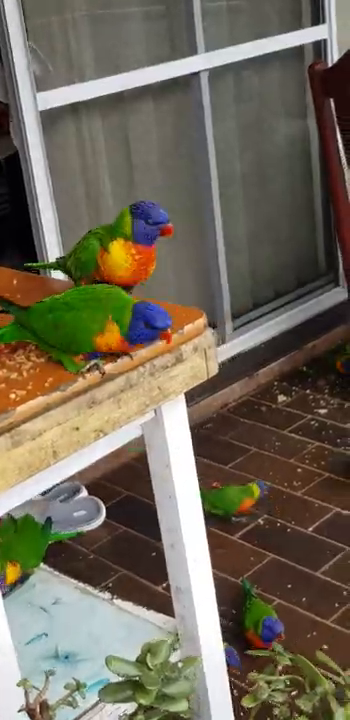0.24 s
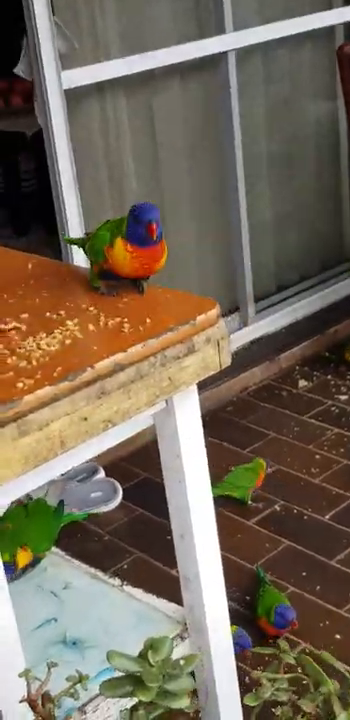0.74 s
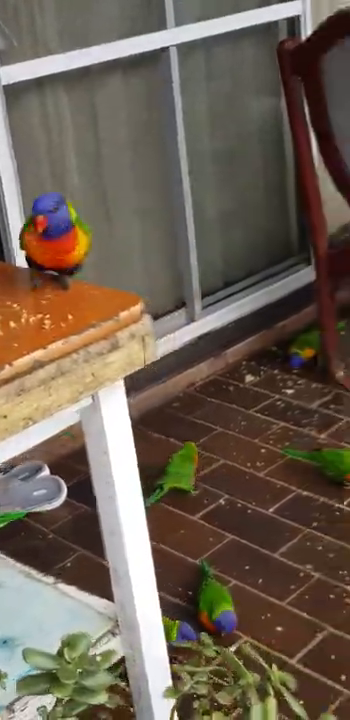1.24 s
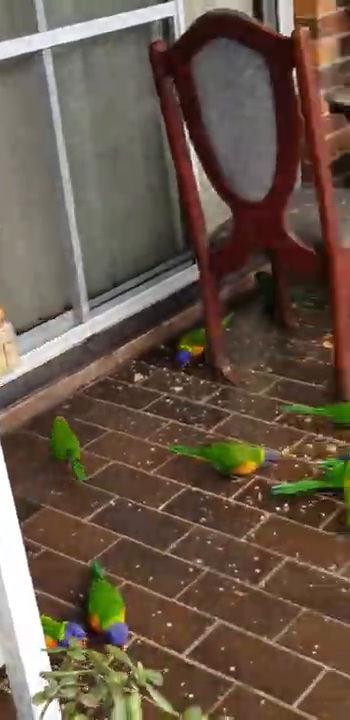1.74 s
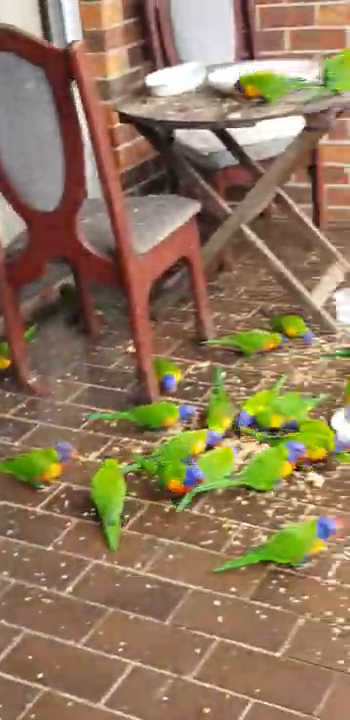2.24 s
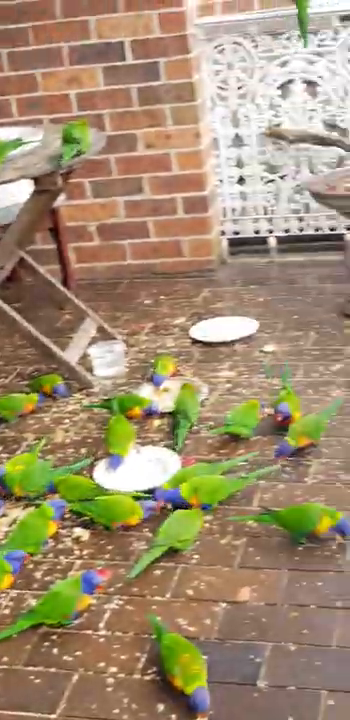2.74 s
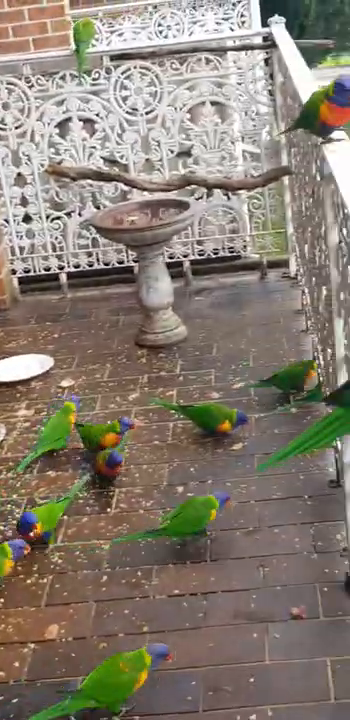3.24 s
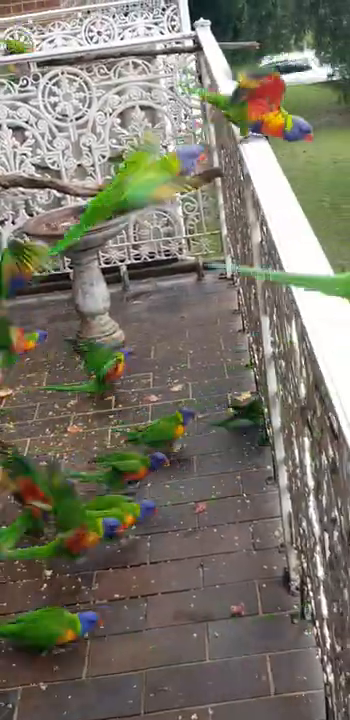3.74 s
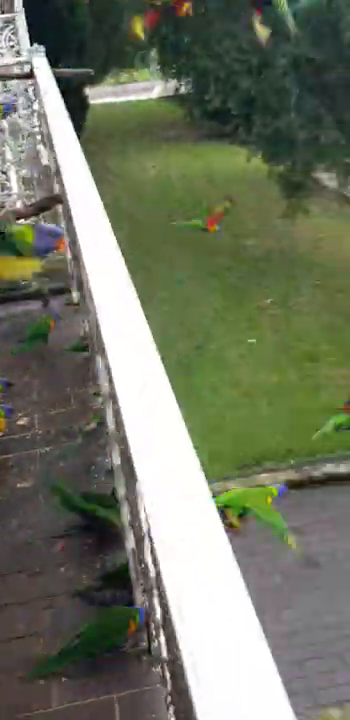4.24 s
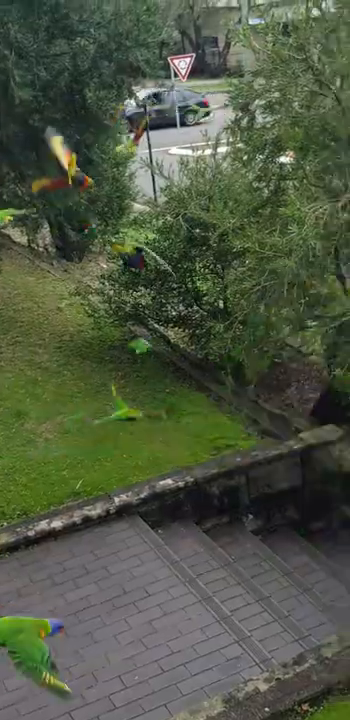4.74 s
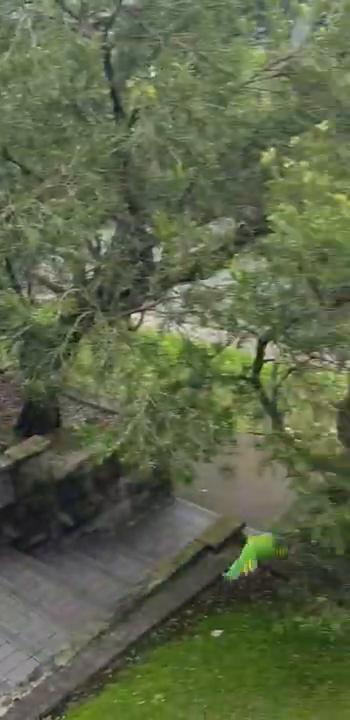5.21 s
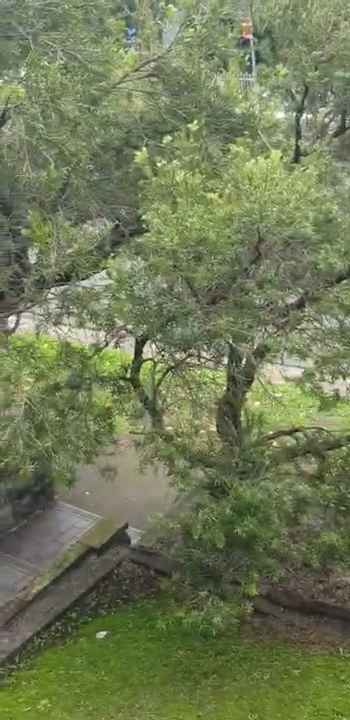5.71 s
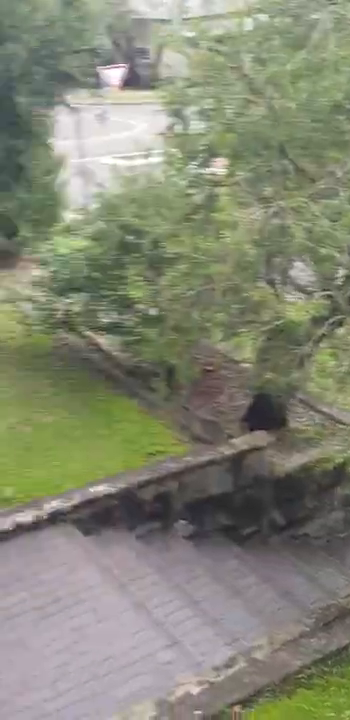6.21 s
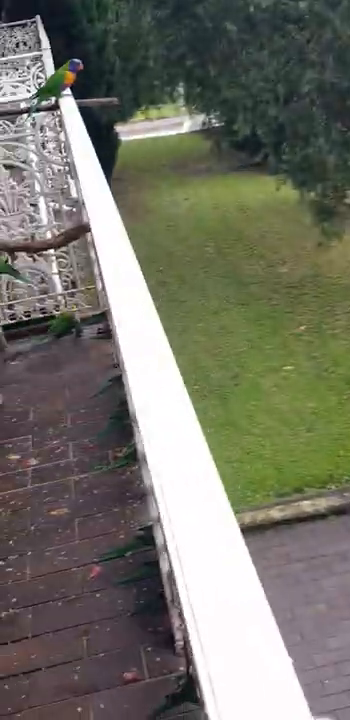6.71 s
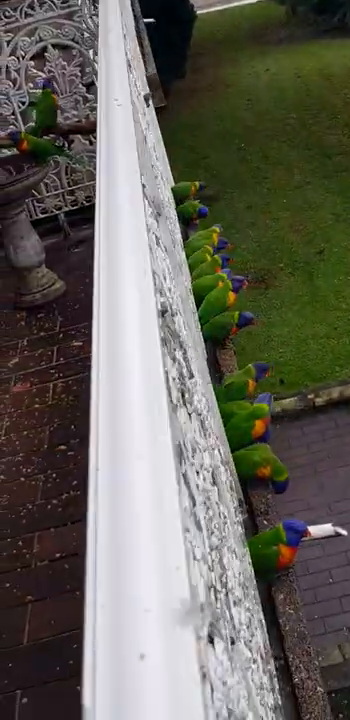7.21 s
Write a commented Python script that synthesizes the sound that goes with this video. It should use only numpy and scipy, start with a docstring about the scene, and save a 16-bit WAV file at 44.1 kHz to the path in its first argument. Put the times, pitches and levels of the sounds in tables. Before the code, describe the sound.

Parrots shriek and rasp close by on a balcony, then the flock bursts off in a wing flurry and screeches on from the garden.

```python
"""Lorikeets feed on a brick balcony: at first gliding shrieks and hoarse squabbling rasps overlap, near the microphone.
Midway the flock takes off in a flurry of wings, puffs of feather noise; then it calls from the garden, sounding wetter.
Calls are rough gliding tones with overtones; many farther ones blur into a chorus, and scattered noise tails add echo.
Light wind, lumpy low noise at the microphone, fades away late; a faint suburban hum of shaped noise stays throughout."""
import sys
import numpy as np
from scipy import signal
from scipy.fft import rfft, irfft, next_fast_len
from scipy.io import wavfile
from scipy.ndimage import uniform_filter1d, map_coordinates

SR = 44100
rng = np.random.default_rng(int(sys.argv[2]) if len(sys.argv) > 2 else 0)


def generate_wav(signal):
    """Clip the signal to [-1, 1] and save it as 16-bit WAV at the path in sys.argv[1]."""
    frames = np.transpose(np.atleast_2d(signal))
    scaled = np.clip(frames, -1, 1) * 32767
    pcm = np.round(scaled).astype(np.int16)
    wavfile.write(sys.argv[1], SR, pcm)


N = 328986  # length of the scene [samples]

# All levels below are relative; later gains and the microphone still act on them.
# Clear calls of the nearest birds: (start [s], length [s], pitch [Hz], glide [octaves], roughness [share],
# level of the fundamental [dB], overtones over the fundamental [dB])
SHRIEK_CALLS = [(0.029, 0.086, 1950, -0.13, 0.39, -42, -17), (0.113, .1, 2110, -0.0022, 0.34, -42, -11.5),
                (0.265, 0.096, 2730, 0.068, .2, -38.5, -7.5), (0.364, .058, 3960, 0.16, 0.21, -32.5, -11.5),
                (0.416, 0.069, 2904, -.2, .14, -37, -6), (0.438, 0.082, 1693, -0.29, 0.61, -35, -9),
                (0.518, 0.049, 2390, 0.02, 0.5, -32.5, 1), (.561, 0.014, 4993, 0.023, 0.01, -14.5, -21),
                (0.585, 0.018, 2478, 0.016, 0.16, -25.5, -8), (0.914, 0.073, 3210, 0.092, 0.45, -27, -3.5),
                (0.939, .058, 2682, -0.31, 0.41, -25, -1.5), (1.027, .082, 2225, -0.14, 0.44, -29.5, -1),
                (1.115, 0.068, 2380, -0.081, 0.08, -36, -2.5), (1.413, .021, 3720, 0.29, 0.15, -36.5, -3),
                (1.433, .038, 4840, -0.032, 0, -34, -21), (1.867, 0.075, 3220, 0.16, 0.45, -26, 3.5),
                (1.929, 0.062, 2924, -0.085, 0.23, -21.5, 0.5),
                (1.982, 0.061, 3175, -0.075, 0.42, -23.5, 1), (3.314, 0.028, 2050, .3, .3, -43, -7),
                (3.395, 0.05, 2167, -0.08, 0.23, -29.5, -8.5), (3.894, 0.05, 2246, .3, 0.43, -28, 1.5),
                (3.918, 0.1, 4300, -0.048, 0.47, -27, -6), (4.044, 0.12, 3110, 0.18, 0.5, -27.5, -2),
                (4.16, .06, 2200, -0.21, 0.36, -31, -4), (4.228, 0.073, 2830, 0.23, 0.23, -24.5, -3.5),
                (4.294, 0.17, 4560, -0.037, 0, -27, -8), (4.329, .06, 3320, -0.12, .19, -23, -7.5),
                (4.402, 0.067, 3447, 0.042, 0.16, -24.5, -2), (4.409, 0.1, 2937, .08, .27, -27, -2.5),
                (4.601, 0.088, 3706, .35, 0.39, -29.5, -6), (4.68, 0.067, 4320, 0.012, 0.16, -30.5, 1.5),
                (4.792, 0.34, 1724, -0.051, 0.24, -39.5, -20), (4.82, 0.15, 2910, 0.15, .26, -28, -6),
                (4.893, .072, 4050, -0.064, 0.17, -30, -4.5), (4.992, 0.12, 2826, .22, 0.34, -33.5, -0.5),
                (5.136, 0.058, 4030, 0.12, 0.28, -39, -20), (5.2, 0.047, 2230, 0.15, 0.34, -37, 4),
                (5.236, 0.054, 2656, 0.011, 0.1, -35, 7.5), (5.274, 0.11, 3090, 0.039, 0.22, -31.5, -4),
                (5.491, 0.099, 2647, 0.223, 0.3, -34.5, -3), (5.568, .07, 3094, .1, 0.16, -33.5, 1),
                (5.601, 0.097, 3317, -0.34, .03, -29, -12.5), (5.854, 0.076, 1432, 0, 0.25, -42, -6),
                (5.861, 0.069, 2827, 0.082, 0.24, -35.5, -4), (5.904, 0.19, 3236, -0.0041, .24, -34.5, -6),
                (5.925, 0.095, 4104, 0.24, 0.11, -30.5, -6.5), (6.229, 0.096, 2580, 0.056, 0.27, -33, -1),
                (6.322, .097, 2562, -.12, .28, -31.5, 0), (6.451, 0.046, 3730, -0.0063, .15, -33.5, -15),
                (6.425, 0.1, 2920, 0.13, 0.23, -29, -2.5), (6.516, 0.047, 4430, 0.029, 0.01, -25.5, -8),
                (6.551, 0.058, 3350, 0.043, .2, -30, -2), (6.599, 0.12, 2610, .04, 0.74, -36.5, -11),
                (6.653, .079, 3085, -0.19, .2, -33.5, -3.5), (6.697, 0.077, 4550, .08, .08, -22.5, -15),
                (6.751, 0.063, 3274, -0.36, 0, -25, -3.5), (6.788, 0.048, 4270, 0, .08, -30.5, -12),
                (6.816, 0.096, 3100, -0.038, .25, -33, -2.5), (6.931, .072, 3024, -0.099, 0.32, -33.5, -3),
                (7.002, .064, 4416, 0.093, .06, -24, -18.5), (7.052, 0.088, 3350, -0.038, 0.25, -35, -4.5),
                (7.3, 0.093, 3440, 0.014, 0.23, -40.5, -4.5)]
# Hoarse calls: (start [s], length [s], pitch [Hz], roughness [share], level [dB],
# drop one octave away from the throat resonance [dB])
RASP_CALLS = [(0.764, .1, 1113, 0.82, -48, -6.5), (1.011, 0.09, 1156, 0.93, -42.5, -4.5),
              (1.261, 0.09, 1196, .8, -36, -2.5), (1.478, 0.11, 1180, 0.9, -37, -4.5),
              (1.767, 0.13, 1204, 0.77, -34.5, -2), (2.001, 0.12, 1641, .8, -22, 7),
              (2.211, 0.08, 1594, 0.78, -23, 4.5), (2.257, 0.099, 1676, .72, -18.5, 7.5),
              (2.494, 0.068, 1130, 0.92, -33.5, -3), (2.544, 0.066, 1500, 0.98, -30.5, -1),
              (2.686, 0.17, 1390, .62, -45, 15.5), (2.912, 0.15, 1323, .5, -42.5, 16),
              (3.129, 0.14, 1400, 0.65, -49.5, 8), (3.427, 0.065, 1128, .85, -18, 5.5),
              (3.465, 0.081, 1021, 0.63, -15.5, 9), (3.559, 0.13, 1021, 0.79, -22, 11),
              (3.757, 0.095, 1027, 0.63, -21, 23.5), (3.917, 0.094, 1031, 0.83, -22.5, 11),
              (4.361, .119, 1620, 1.13, -21, 20), (7.4, 0.088, 1480, 0.98, -36, 0.5)]
# Pitch at the start, middle and end of a rasp [share of its listed pitch]
RASP_BEND_SHARES = (0.93, 1, 0.95)
# How a wide-open beak radiates a rasp: (frequency [Hz], gain [dB])
BEAK_RESPONSE = [(300, -40), (700, -15), (1200, -3), (2150, 0), (2900, -1.5), (3500, -1.5), (4400, 3.5),
                 (5800, -1), (10000, 0.5), (14000, 0.5)]
# Rest of the flock: (time [s], level [dB])
FLOCK_LEVEL = [(0, -51), (.45, -48), (.7, -59), (1.6, -48.5), (2.6, -46), (3.3, -56.5), (3.6, -29.5),
               (3.75, -38), (4, -27.5), (4.5, -26.5), (4.95, -34.5), (5.45, -45.5), (5.8, -46.5),
               (6.45, -32), (6.8, -32), (7, -40), (7.46, -39)]
# Blurred far voices: (frequency [Hz], density [dB per Hz])
CHORUS_SPECTRUM = [(700, -35), (1600, 0.5), (2800, -0.5), (4200, 6.5), (6000, -5), (8000, -3), (11500, -24),
                   (14500, -28)]
# Wingbeats: (time [s], level [dB])
WING_LEVEL = [(.3, -57), (.5, -49.5), (.7, -47), (3.25, -47), (3.5, -35.5), (4, -31), (4.4, -37),
              (4.8, -38.5), (5.6, -49.5)]
# Air pushed by feathers: (frequency [Hz], density [dB per Hz])
FEATHER_SPECTRUM = [(80, -9), (150, -0.5), (350, -3.5), (580, -6.5), (900, 2), (1400, -5.5), (2000, 1),
                    (5000, -26), (14000, -27)]
# Wind on the microphone: (time [s], level [dB])
WIND_LEVEL = [(0.0, -49), (0.06, -42.5), (0.79, -56), (0.91, -37.5), (2.43, -41.5), (2.78, -33.5),
              (2.97, -50.5), (4.05, -35.5), (5.03, -60.5), (7.29, -63), (7.46, -64)]
# Wind rumble: (frequency [Hz], density [dB per Hz])
WIND_SPECTRUM = [(12, -44), (20, -43), (43, -3), (64, 3.5), (182, -15.5), (265, -20), (300, -12.5),
                 (390, -66), (660, -120)]
# The one brief buffet: (frequency [Hz], density [dB per Hz])
BUFFET_SPECTRUM = [(25, -3), (60, 8), (200, -8), (500, -39), (1500, -90)]
# Hum of streets: (frequency [Hz], density [dB per Hz])
SUBURB_SPECTRUM = [(40, -7), (100, 1), (220, -2), (600, -12), (1000, -12.5), (2000, -28), (14000, -47)]
# Echo of the house front and garden: (frequency [Hz], time to fall by 60 dB [s])
ECHO_DECAY = [(200, 0.13), (2500, 0.31), (6000, 0.27), (14000, 0.22)]
# Echo over direct sound: (time [s], level [dB])
ECHO_LEVEL = [(0, -6), (2, -3.5), (4.6, -2), (7.46, -2.5)]
# Left port over the shaded right one: (frequency [Hz], level [dB])
PORT_DIFFERENCE = [(1000, 1.84), (5000, 1.45), (8000, 4.1)]
# Colour of the microphone: (frequency [Hz], gain [dB])
MICROPHONE_RESPONSE = [(6800, 0), (7250, -5.5), (7900, -3), (10300, 0), (12700, -1.5), (14600, -9.5)]

TOP_HZ = 14580  # band limit of the microphone
SHRIEK_ARCH_OCTAVES_PER_S = 0.349  # both ends of a call sag below its middle, the more the longer it lasts
THIRD_PARTIAL_DB = -6.5  # under the second
SHRIEK_FADE_S, ROUGH_FADE_S = .01, .08  # a pure whistle starts fast; roughness squared adds a slower swell
THROAT_HZ = 4270  # the resonance that rasps press into
RASP_EDGE_HZ, RASP_EDGE_DB = 5400, -3.5  # where the strong partials end, and the drop there


def amp(db):
    """Amplitude factor of a level in dB."""
    return 10 ** (np.asarray(db) / 20)


def unit(x):
    """x scaled to rms 1."""
    return x / np.sqrt(np.mean(x ** 2) + 1e-20)


def along(points, hz):
    """Read (frequency [Hz], value) points on a log frequency axis."""
    f, v = np.transpose(points)
    return np.interp(np.log(hz + 1), np.log(f + 1), v)


def curve(rows):
    """One value per sample from (time [s], value) rows."""
    return np.interp(np.arange(N) / SR, *np.transpose(rows))


def wobble(rate, size):
    """A smooth random curve with rate knots a second."""
    knots = rng.standard_normal(int(size * rate / SR) + 5)
    return map_coordinates(knots, [np.arange(size) * rate / SR + 2], order=2)


def filtered(x, response):
    """x times a response of frequency, padded so its end does not wrap round."""
    m = next_fast_len(N + SR // 4)
    return irfft(rfft(x, m) * response(np.fft.rfftfreq(m, 1 / SR)), m)[..., :N]


def noise(spectrum, side_db):
    """Coloured stereo noise of rms 1; a stronger side signal makes it wider."""
    mid, side = filtered(rng.standard_normal((2, N)), lambda hz: amp(along(spectrum, hz)))
    side = amp(side_db) * side
    return unit(np.array([mid + side, mid - side]))


def add(track, sound, start, spread_db):
    """Put a bird somewhere around: its sound reaches the two ports at different times and levels."""
    lag = rng.integers(-12, 13)  # samples
    pan_db = spread_db * rng.normal()
    for channel, sign in enumerate((1, -1)):
        first = max(0, round(start * SR) + sign * lag)
        room_left = track[channel, first:first + len(sound)]
        room_left += amp(sign * pan_db) * sound[:len(room_left)]


def call(length, pitches, rough, levels_db, waver, jitter, jitter_hz, rattle_db, rattle_hz, doubling, fade, rolloff_db):
    """One call: the syrinx glides through three pitches; roughness shakes its period and chops its strength."""
    length = max(length, .01)
    t = np.arange(int((length + fade) * SR)) / SR
    size = len(t)
    u = np.clip((t - fade / 2) / length, 0, 1)  # progress through the call
    glide = np.polyval(np.polyfit([0, .5, 1], pitches, 2), u)
    rattle_rate = rattle_hz * (1 + 0.347 * wobble(119.6, size))
    rattle = np.sin(2 * np.pi * np.cumsum(rattle_rate) / SR)
    # the voice slips in and out of its harsh state
    harsh = rough * amp(2.5 * wobble(50, size))
    kinks = waver * wobble(110, size)
    shake = jitter * harsh * (wobble(jitter_hz, size) + 0.28 * rattle)
    pitch = glide * (1 + kinks + shake)
    phase = 2 * np.pi * np.cumsum(pitch) / SR
    # in a very hoarse voice even the lowest partial spreads into a band
    smear = 2.4 * rough ** 2 * wobble(350, size)
    tone = np.zeros(size)
    for k in range(1, int(TOP_HZ / min(pitches)) + 1):
        # overtones above the listed ones fall by rolloff_db per kHz
        beyond_khz = max(k - len(levels_db), 0) * pitches[1] / 1000
        level_db = levels_db[min(k, len(levels_db)) - 1] - rolloff_db * beyond_khz
        # the moving beak and tongue favour one partial after another
        beak_db = 3.5 * (1 - .6 * rough) * wobble(70, size)
        partial = np.sin(k * phase + smear + 2 * np.pi * rng.random())
        audible = k * pitch < SR / 2  # no aliasing
        tone += amp(level_db) * unit(amp(beak_db) * partial) * audible
    # alternate cycles differ in size, which adds lines halfway between the partials
    alternation = 1 + doubling * harsh * np.sin(phase / 2)
    chopping = amp(rattle_db * rough * (rattle + wobble(171.4, size)))
    strength = unit(alternation * chopping)
    gate = np.sin(np.pi / 2 * np.clip(np.minimum(t, t[-1] - t) / fade, 0, 1)) ** 2
    swell = amp(2.4 * (np.sin(np.pi * u) - 2 / np.pi))
    return tone * strength * gate * swell


def shrieks():
    """Near birds give shrill, arching whistles; the rough ones swell into screeches."""
    out = np.zeros((2, N))
    for start, length, pitch, glide, rough, level_db, overtones_db in SHRIEK_CALLS:
        sag = SHRIEK_ARCH_OCTAVES_PER_S * length
        pitches = pitch * 2 ** np.array([-glide / 2 - sag, 0, glide / 2 - sag])
        levels_db = level_db + np.array([0, overtones_db, overtones_db + THIRD_PARTIAL_DB])
        fade = SHRIEK_FADE_S + ROUGH_FADE_S * rough ** 2
        sound = call(length, pitches, rough, levels_db, waver=.009 + .085 * rough,
                     jitter=.05 + .2 * rough, jitter_hz=1503, rattle_db=5.5, rattle_hz=212,
                     doubling=0.55, fade=fade, rolloff_db=0.6)
        add(out, sound, start - fade / 2, spread_db=1)
    return out


def rasps():
    """Squabbling birds force the voice: overtones smear into a rattling hiss around the throat resonance."""
    out = np.zeros((2, N))
    for start, length, pitch, rough, level_db, focus_db in RASP_CALLS:
        partials = pitch * np.arange(1, round(RASP_EDGE_HZ / pitch) + 1)
        octaves_off = np.abs(np.log2(partials / THROAT_HZ))
        levels_db = level_db - focus_db * np.sqrt(octaves_off)
        levels_db[-1] += RASP_EDGE_DB
        sound = call(length, pitch * np.array(RASP_BEND_SHARES), rough, levels_db, waver=0.0181,
                     jitter=.1, jitter_hz=2202, rattle_db=3.3, rattle_hz=190.2,
                     doubling=0, fade=0.0524, rolloff_db=1.18)
        add(out, sound, start - .021, spread_db=1)
    return filtered(out, lambda hz: amp(along(BEAK_RESPONSE, hz)))


def flock(count=170):
    """Many farther birds chirp at random and blur into a chorus."""
    out = np.zeros((2, N))
    for turn, (when, size, height, rise, bend, rough) in enumerate(rng.random((count, 6))):
        middle_hz = 2400 + 1800 * height ** 1.2
        pitches = middle_hz * np.array([.8 + .26 * rise, 1, .84 + .24 * bend])
        sound = call(.025 + .06 * size, pitches, .05 + .25 * rough, (0, -3, -8), waver=.025,
                     jitter=.07, jitter_hz=1200, rattle_db=7, rattle_hz=210,
                     doubling=1.1, fade=.012, rolloff_db=1)
        start = (turn + 2 * when) * N / SR / count - .08
        add(out, sound, start, spread_db=2)
    # even out the loudness, so that the level table sets it
    power = np.abs(uniform_filter1d(np.mean(out ** 2, axis=0), SR // 8))
    voices = out / np.sqrt(power + 0.098 * power.mean())
    blur = amp(-6.5) * noise(CHORUS_SPECTRUM, side_db=-1)
    return amp(curve(FLOCK_LEVEL) + 2.0) * (voices + blur)


def wings(count=8):
    """Birds beat their wings, each at its own uneven pace; every downstroke is a puff of feather noise."""
    power = np.zeros(N)
    for pace in rng.uniform(.6, 1.3, count):
        effort = wobble(6, N)
        beats_per_s = 14 * pace * (1 + 0.2 * effort)
        stroke = np.sin(2 * np.pi * (np.cumsum(beats_per_s) / SR + rng.random()))
        power += amp(7.5 * stroke + 2 * effort) ** 2
    puffs = np.sqrt(power) * noise(FEATHER_SPECTRUM, side_db=-2.0)
    return amp(curve(WING_LEVEL)) * unit(puffs)


def wind():
    """Moving air rumbles at the microphone in uneven lumps of low noise."""
    lumps = noise(WIND_SPECTRUM, side_db=-3)
    return amp(2.5) * amp(curve(WIND_LEVEL) + 0.81 * wobble(20, N)) * lumps


def buffet():
    """One brief thump of wind: low noise under a bell-shaped envelope."""
    envelope = np.exp(-((np.arange(N) / SR - .958) / 0.016) ** 2)
    return amp(-21) * envelope * noise(BUFFET_SPECTRUM, side_db=2)


def suburb():
    """Streets in the distance merge into a steady low hum of noise."""
    return amp(-42.5) * noise(SUBURB_SPECTRUM, side_db=-10.5)


def echo(x, count=16):
    """Walls and trees scatter the sound; the pattern changes as the microphone moves."""
    out = np.zeros((2, N + SR))
    hop = N // count + 1
    for first in range(0, N, hop):
        # each stretch of sound gets a fresh noise tail that decays by frequency
        hz, t, z = signal.stft(rng.standard_normal((2, SR // 2)), SR, nperseg=256)
        decay = amp(-60 * t / along(ECHO_DECAY, hz)[:, None])
        onset = 1 - np.exp(-t / 0.0029)
        tail = signal.istft(z * decay * onset, SR, nperseg=256)[1]
        tail = tail / np.linalg.norm(tail[0])
        answer = signal.fftconvolve(x[:, first:first + hop], tail, axes=1)
        out[:, first:first + answer.shape[1]] += answer
    return out[:, :N]


def scene():
    """Near birds and the wider flock with their echo, then wings, wind and suburb."""
    birds = shrieks() + rasps() + flock()
    wet = amp(curve(ECHO_LEVEL))
    direct = birds / np.sqrt(1 + wet ** 2)  # wetter calls do not gain power
    mix = direct + echo(wet * direct) + wings() + wind() + buffet() + suburb()
    # the right port is shaded, most of all in the treble
    return filtered(mix, lambda hz: amp(np.outer([.5, -.5], along(PORT_DIFFERENCE, hz))))


def record(dry):
    """The microphone colours the sound, the loudest peaks are rounded, and the band limit cuts the top."""
    x = filtered(dry, lambda hz: amp(along(MICROPHONE_RESPONSE, hz)))
    x = x / (1 + np.abs(x / .88) ** 4) ** .25
    return filtered(x, lambda hz: hz < TOP_HZ)


dry = scene()
out = record(dry)
generate_wav(out)
```